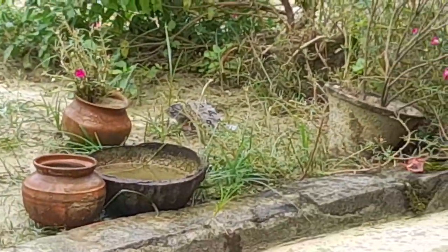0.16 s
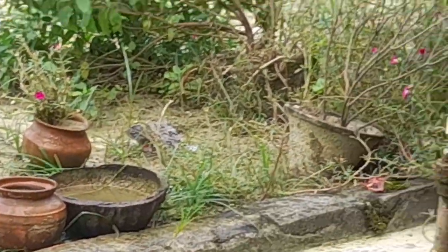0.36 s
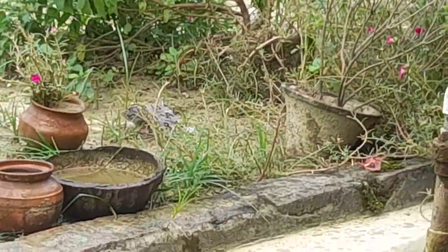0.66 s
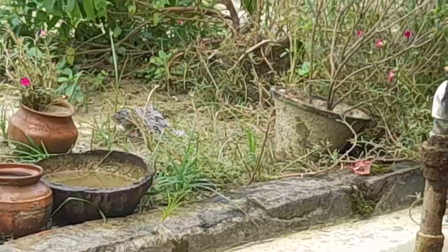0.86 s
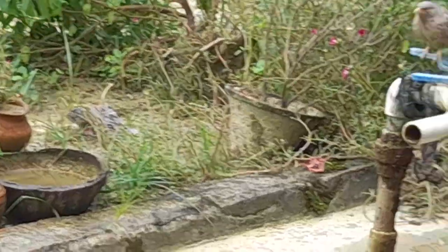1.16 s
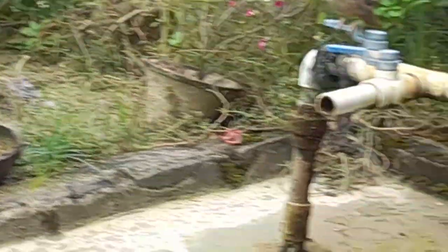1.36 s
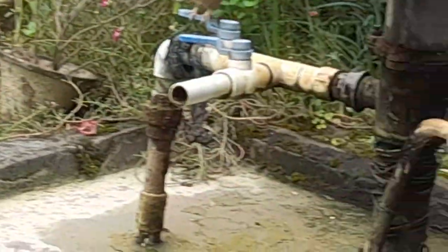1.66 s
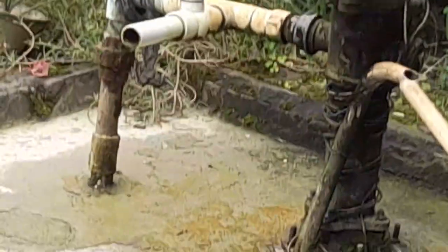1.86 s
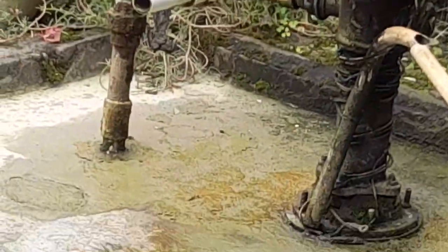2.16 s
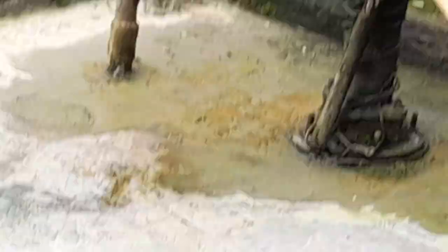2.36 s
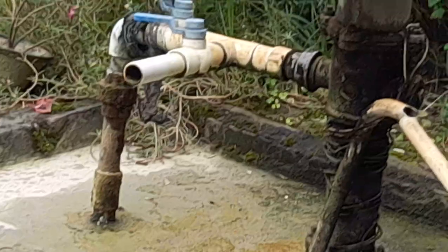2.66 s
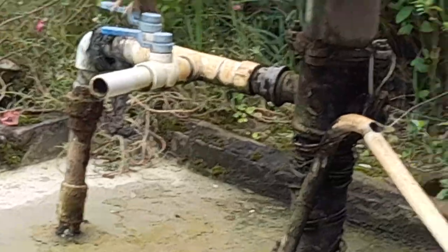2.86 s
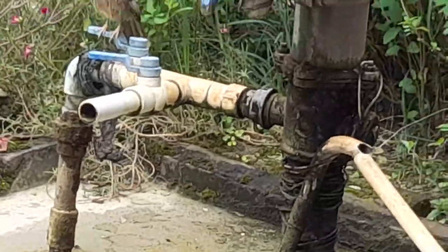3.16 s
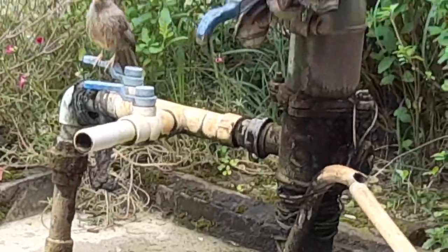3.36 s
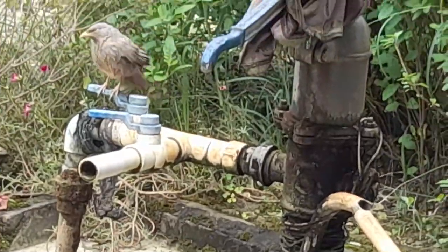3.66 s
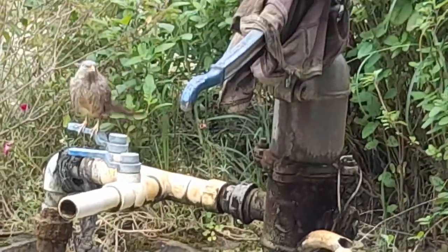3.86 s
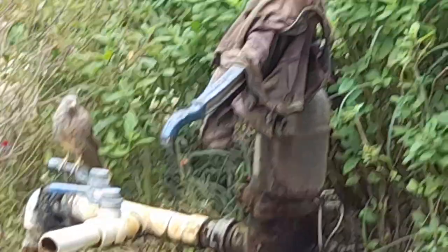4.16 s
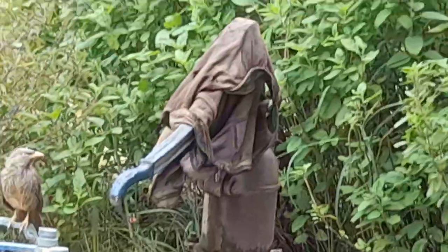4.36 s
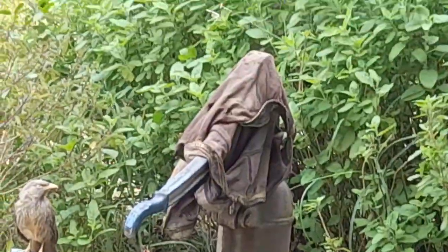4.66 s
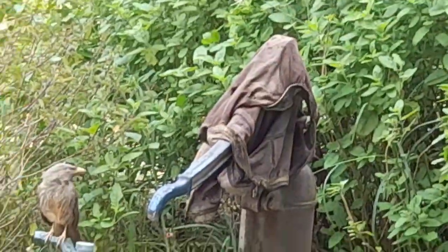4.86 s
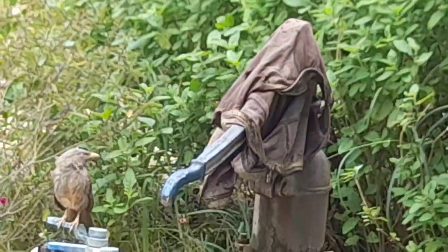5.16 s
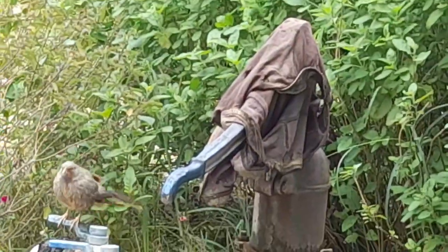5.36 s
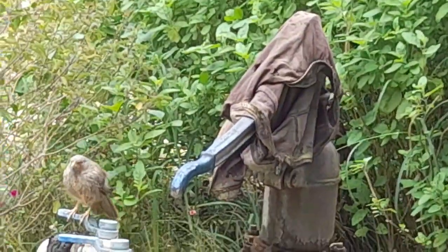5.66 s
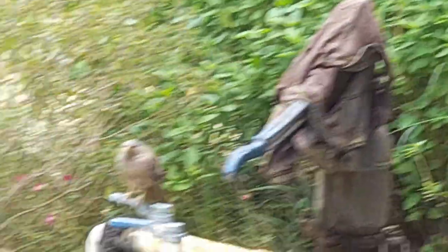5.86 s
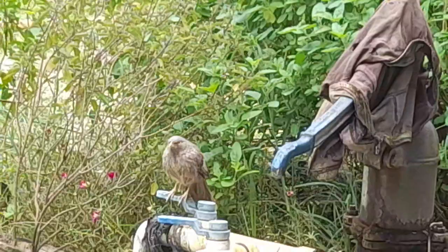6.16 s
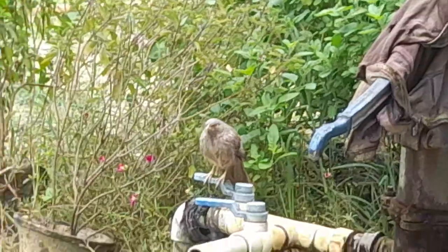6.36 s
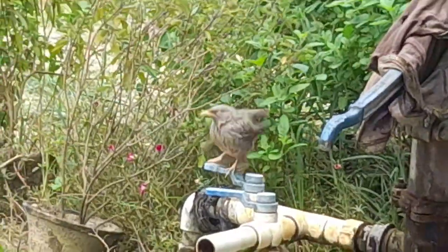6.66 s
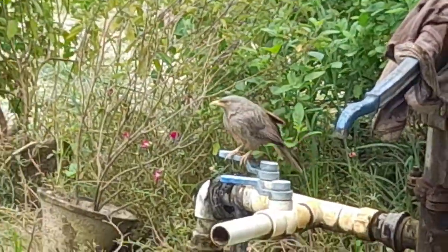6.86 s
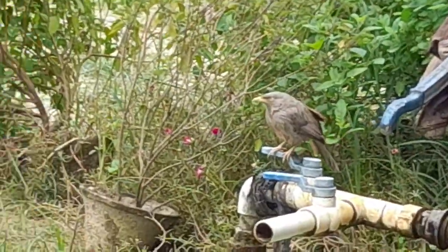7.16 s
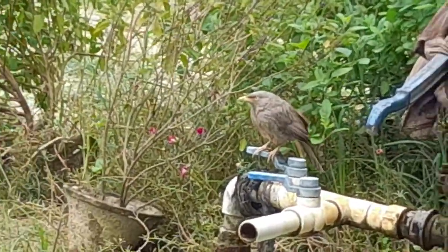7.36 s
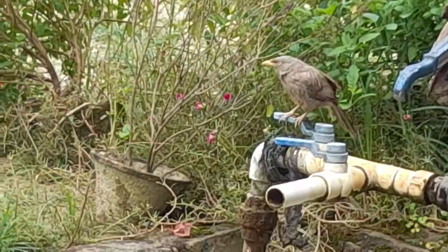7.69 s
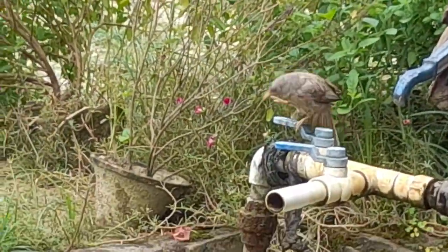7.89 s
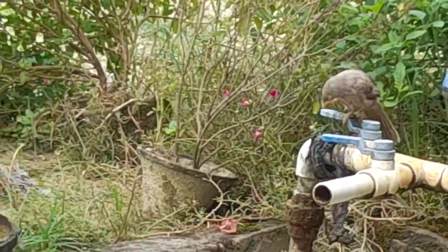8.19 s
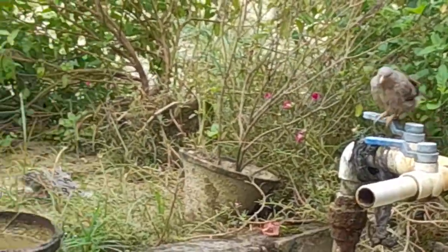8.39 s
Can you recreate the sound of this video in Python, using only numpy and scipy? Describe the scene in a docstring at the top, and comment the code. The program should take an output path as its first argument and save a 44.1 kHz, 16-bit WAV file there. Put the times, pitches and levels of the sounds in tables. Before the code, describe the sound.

Garden babblers give short arched whistles breaking into rasps over a steady low hum and leaf hiss, with a few finger knocks on the phone.

```python
"""Babblers call in short clusters in a garden: arched whistles that often break into a rasp.
Each note sums syrinx overtones, coloured by throat and beak, with a short echo from yard walls.
Shaped noise makes distant rumble, a steady bed, an insect's whine, a faint high hiss band and leaves that
hiss as the breeze rises. A hand-held phone hears it all; fingers knock on it (sagging thumps with ticks)
near its left microphone, the duller of the two."""
import sys
import numpy as np
from scipy import signal
from scipy.fft import rfft, irfft, next_fast_len
from scipy.io import wavfile
from scipy.ndimage import uniform_filter1d

SR = 44100
rng = np.random.default_rng(int(sys.argv[2]) if len(sys.argv) > 2 else 0)


def generate_wav(sig):
    """Save sig (samples, or channels by samples) to the path in sys.argv[1] as 16-bit PCM at SR."""
    pcm = np.round(np.clip(np.atleast_2d(sig).T, -1, 1) * 32767).astype(np.int16)
    wavfile.write(sys.argv[1], SR, pcm)


def ratio_of_db(decibels):
    """Turn decibels (scalar or array-like) into linear amplitude factors; 0 dB maps to 1."""
    return 10 ** (np.asarray(decibels, float) / 20)


N = 376173
SIZE = next_fast_len(N)
HZ = np.arange(SIZE // 2 + 1) * SR / SIZE


def shape(points, hz):
    """A spectrum table read on a log-frequency axis."""
    f, value = np.transpose(points)
    return np.interp(np.log(hz + 1), np.log(f), value)


def curve(rows):
    """A level table in dB as a gain for every sample."""
    s, db = np.transpose(rows)
    return ratio_of_db(np.interp(np.arange(N) / SR, s, db))


def walk(rate, count):
    """Random levels held 1 / rate s and slewed twice; spread near 1."""
    hold = int(SR / rate)
    steps = np.repeat(rng.standard_normal(count // hold + 1), hold)
    slewed = uniform_filter1d(uniform_filter1d(steps, hold), hold)
    return 1.3 * slewed[:count]


def noise(gain):
    """Stereo noise of rms 1 with this gain per frequency; the two sides share their bass."""
    # how far the two sides hear the same noise: (frequency [Hz], common share of power [0-1])
    alike = [(25, 0.65), (60, 1), (130, 1), (290, 1), (640, 0.57), (1400, 0.023), (3000, 0), (6000, .0)]
    common, left, right = rfft(rng.standard_normal((3, SIZE)))
    share = np.clip(shape(alike, HZ), 0, 1)
    pair = np.sqrt(share) * common + np.sqrt(1 - share) * np.array([left, right])
    x = irfft(pair * gain, SIZE)[:, :N]
    return x / np.sqrt(np.mean(x ** 2))


def garden():
    """Far rumble, a steady bed, breeze-led leaves, one narrow insect whine and a faint steady high hiss band."""
    # rise and fall of the far rumble: (time [s], level [dB])
    rumble_level = [(0.0, -37), (0.71, -40), (1.73, -37.5), (2.09, -38.5), (3.61, -38.5), (4.39, -38),
                    (4.89, -41.5), (5.75, -38), (6.32, -41), (6.72, -36), (8.53, -43.5)]
    # spectrum of the far rumble: (frequency [Hz], relative density [dB])
    rumble_tone = [(25, -24), (40, -16.5), (55, -1), (70, -1.5), (92, 2), (108, 2), (125, 4), (150, -7),
                   (200, -16), (260, -15.5), (400, -52)]
    rumble = curve(rumble_level) * noise(ratio_of_db(shape(rumble_tone, HZ)))

    # spectrum of the steady bed: (frequency [Hz], relative density [dB])
    bed_tone = [(88, -22.5), (150, -2.5), (205, -9.5), (280, -11), (346, -5.5), (429, -13), (1180, -21.5),
                (1300, -24), (2080, -24), (4700, -31.5), (6300, -41), (7950, -34.5), (8600, -107),
                (10400, -53), (15700, -60)]
    bed_db = -46.5 + 0.62 * walk(6, N)
    bed = ratio_of_db(bed_db) * noise(ratio_of_db(shape(bed_tone, HZ)) * (HZ > 120) * (HZ < 15600))

    # leaf hiss as the breeze comes and goes: (time [s], level [dB])
    breeze_level = [(0, -57.5), (1.3, -65), (2.3, -64.5), (4.2, -60.5), (4.8, -61.5), (5.75, -53.5),
                    (6.75, -50), (7.9, -50.5), (8.2, -53), (8.53, -55.5)]
    # spectrum of the leaf hiss: (frequency [Hz], relative density [dB])
    leaf_tone = [(600, -9.5), (1500, -1.5), (3500, 0.5), (6000, -7.5), (7800, -5), (8900, -14.5),
                 (10500, -6.5), (12500, -4), (14800, -7), (15800, -18)]
    flicker = ratio_of_db(.6 * walk(12, N))
    leaves = curve(breeze_level) * flicker * noise(ratio_of_db(shape(leaf_tone, HZ)) * (HZ > 400))

    # loudness of the insect: (time [s], level [dB])
    insect_level = [(0, -67.5), (1.65, -71), (1.9, -91), (2.6, -80), (2.95, -67), (4.9, -67.5), (5.1, -83),
                    (6.1, -66), (8.53, -67)]
    insect_hz, insect_width_hz = 7840, 232
    insect = curve(insect_level) * noise(1 / (1 + (2 * (HZ - insect_hz) / insect_width_hz) ** 2))

    high_band_hz, high_band_width_hz, high_band_db = 10330, 860, -74
    high_band = ratio_of_db(high_band_db) * noise(1 / (1 + (2 * (HZ - high_band_hz) / high_band_width_hz) ** 2))
    return rumble + bed + leaves + insect + high_band


def bends(length, rise_s, fall_s):
    """Times in a note, and two parabolas that reach 1 at its start and at its end."""
    t = np.linspace(0, length, num=14)
    before = np.clip(1 - t / rise_s, 0, 1) ** 2
    after = np.clip(1 - (length - t) / fall_s, 0, 1) ** 2
    return t, before, after


def chirp(s, length, hz, db, pan_db):
    """Slides up, holds while fading, sinks a little at the end; brightest while it holds."""
    echo_db, rough = -1.5, .22
    bright, edge_bright = -0.93, -2  # dB per kHz
    t, before, after = bends(length, rise_s=.016, fall_s=.02)
    pitch = hz * (1 - .1 * before - .07 * after)
    level_db = db - 4 * before - 4 * t / length - 10 * after
    tone = bright + (edge_bright - bright) * np.maximum(before, after)
    return pan_db, echo_db, np.transpose([s + t, pitch, level_db, tone, rough + 0 * t])


def swoop(s, length, hz, db, drop, pan_db):
    """An arch, duller than a chirp: rise and final drop bend around a sagging top and brighten the tone."""
    echo_db, rough, sag_per_s = -2.5, .1, 1.1  # the sag is a share of the pitch
    bright, edge_bright = -5.5, -3  # dB per kHz
    t, before, after = bends(length, rise_s=.018, fall_s=.022)
    pitch = hz * (1 - .16 * before - drop * after - sag_per_s * t)
    level_db = db - 6 * before - 3 * after
    tone = bright + (edge_bright - bright) * np.maximum(before, after)
    return pan_db, echo_db, np.transpose([s + t, pitch, level_db, tone, rough + 0 * t])


def rasp(s, length, db, bright, pan_db):
    """A harsh burst, every overtone smeared, that swells quickly and dies while its pitch sinks slightly."""
    pitch_hz, sag_share, rough, echo_db = 590, .04, 1, -1.5
    swell = [(0, -3), (.35, 0), (1, -9)]  # (share of the length, dB)
    rows = [(s + u * length, pitch_hz * (1 - sag_share * u), db + d, bright, rough) for u, d in swell]
    return pan_db, echo_db, rows


def peep(s, length, hz, db, pan_db):
    """A thin, nearly level note with weak overtones, loudest in the middle."""
    sag_share, edge_db, bright, rough, echo_db = .02, -4, -9, .3, -2  # brightness in dB per kHz
    rows = [(s + u * length, hz * (1 - sag_share * (u - .5)), db + edge_db * abs(2 * u - 1), bright, rough)
            for u in (0, .5, 1)]
    return pan_db, echo_db, rows


def scold(s, length, hz, db, rasp_db):
    """The nearest bird's loud whistle sags and brightens, then plunges into a rasp."""
    # the plunge: (time after the whistle [s], pitch [Hz], level against the rasp [dB],
    # brightness [dB per kHz], roughness [0-1])
    plunge = [(0.014, 1748, -4.5, -5, .3), (.023, 1248, 0.5, -1, 0.63), (.035, 860, 2.5, 0.5, .85),
              (.049, 843.5, -25, -6, 0.6)]
    pan_db, echo_db = 13, -11.5
    attack_s, start_db, fade_db, sag_hz_per_s = 0.0085, -10, -7, 3600
    start_bright, end_bright, end_rough = -6.5, -2, .12  # brightness in dB per kHz
    rows = [(s, hz, db + start_db, start_bright, 0),
            (s + attack_s, hz - sag_hz_per_s * attack_s, db, start_bright, 0),
            (s + length, hz - sag_hz_per_s * length, db + fade_db, end_bright, end_rough)]
    rows += [(s + length + after, f, rasp_db + d, bright, rough) for after, f, d, bright, rough in plunge]
    return pan_db, echo_db, rows


def squawk(s, length, hz, db, rough):
    """The nearest bird's held hoarse note with short edges."""
    pan_db, echo_db = 13, -11.5
    edge_s, edge_db, bright = .008, -5, -1.8  # brightness in dB per kHz
    steps = [(0, edge_db), (edge_s, 0), (length - edge_s, 0), (length, edge_db)]
    return pan_db, echo_db, [(s + u, hz, db + d, bright, rough) for u, d in steps]


def notes():
    """All notes as (pan dB, echo dB, rows of s, pitch Hz, level dB, brightness dB per kHz, roughness 0-1)."""
    # bright chirps: (start [s], length [s], pitch between the bends [Hz], level [dB], left minus right [dB])
    chirps = [(.005, .03, 2450, -42.5, 4), (0.052, 0.035, 3230, -43.5, 13), (.06, 0.0728, 2350, -45.5, 10),
              (0.139, 0.048, 3000, -46, 3), (0.507, 0.046, 2484, -46.5, 13), (1.949, .04, 2396, -44, -3),
              (4.085, 0.05, 2460, -49.5, -4), (6.176, 0.04, 3160, -44.5, 7)]
    # duller arched swoops: (start [s], length [s], pitch ahead of bends and sag [Hz], level [dB],
    # final drop [share of pitch], left minus right [dB])
    swoops = [(.006, 0.065, 2230, -42.5, .01, -3), (0.233, 0.044, 2600, -43, 0.35, 4),
              (0.33, .047, 2270, -47, 0.106, -3), (0.593, .043, 3116, -49, 0.35, 0),
              (0.688, 0.075, 2680, -45, .2, -3), (1.997, .039, 3083, -47.5, .5, -3),
              (4.173, 0.055, 2496, -47.5, 0.093, -1), (8.151, 0.034, 3210, -49, 0.071, 3),
              (8.258, .045, 2070, -57.5, .12, -15)]
    # thin peeps of farther birds: (start [s], length [s], middle pitch [Hz], level [dB], left minus right [dB])
    peeps = [(.582, .015, 2290, -49, 4), (1.61, 0.016, 2050, -57, 9), (1.647, 0.13, 3600, -61, -10),
             (1.843, 0.04, 2707, -54, -4), (2.566, 0.017, 3000, -59, -7), (2.627, .02, 2920, -61, 12),
             (2.694, .025, 2955, -61, -10), (2.765, 0.024, 2840, -61, 3), (2.805, .125, 3610, -62, -10),
             (5.33, .04, 2100, -59, 3), (5.49, 0.041, 2810, -57, 6), (5.672, 0.061, 2763, -55, 2),
             (6.12, 0.062, 2288, -52.5, 0), (6.628, .035, 2039, -53.5, -10), (7.141, 0.018, 3515, -58, -12),
             (7.163, .11, 1000, -58, -4), (7.236, .03, 3430, -57, -9), (7.288, 0.022, 1390, -56, -9),
             (8.05, .15, 4320, -62, 8), (8.29, 0.062, 3750, -63, 0)]
    # rasps, often where a swoop breaks off: (start [s], length [s], level [dB],
    # brightness [dB per kHz], left minus right [dB])
    rasps = [(0.086, 0.05, -45.5, -3, -6), (0.353, 0.025, -50.5, -1.5, -2), (0.607, 0.042, -51, -1.5, -4),
             (0.751, 0.049, -50.5, -1.5, -7), (2.028, 0.0195, -44.5, -3, -8), (3.459, 0.033, -53, -3, -6),
             (4.237, 0.035, -52, -3, 1), (5.551, 0.23, -53, -4.5, -3.5), (5.614, .06, -47.5, -6, 0),
             (6.207, .03, -45, -2.5, -1), (6.67, 0.045, -49, -5, -5), (7.211, 0.027, -50, -4, -14),
             (7.581, 0.041, -48, -3, 21)]
    # scolds of the nearest bird: (start [s], whistle length [s], start pitch [Hz], whistle level [dB],
    # rasp level [dB])
    scolds = [(1.757, .045, 2288, -36, -40.5), (3.749, .088, 2320, -35, -34.5)]
    # its squawk after the second scold: (start [s], length [s], pitch [Hz], level [dB], roughness [0-1])
    squawks = [(3.923, .055, 432, -37.5, .67)]
    kinds = [(chirp, chirps), (swoop, swoops), (peep, peeps), (rasp, rasps), (scold, scolds), (squawk, squawks)]
    return [kind(*row) for kind, table in kinds for row in table]


def syrinx(rows):
    """Overtones of the syrinx through throat and beak; roughness smears each one into a noisy band."""
    # resonances of throat and beak: (centre [Hz], width [Hz], peak [dB])
    resonances = [(900, 340, 2), (2220, 560, 5.5), (3060, 380, -4), (4300, 560, 7), (5200, 380, 2.5),
                  (6200, 550, -1), (7860, 1200, -20), (13300, 2000, -11)]
    s, *columns = np.transpose(rows)
    t = np.arange(s[0], s[-1], 1 / SR)
    hz, db, bright, rough = (uniform_filter1d(np.interp(t, s, c), size=150, mode="nearest") for c in columns)
    rough = np.clip(rough, 0, 1) ** 1.2

    jitter = (.004 + .015 * rough) * walk(300, len(t))
    phase = 2 * np.pi * np.cumsum(hz * (1 + jitter)) / SR
    k = np.arange(1, 1 + int(15500 / hz.min()))[:, None]  # overtone numbers
    throat = sum(ratio_of_db(peak_db) / (1 + (2 * (k * hz - f) / width) ** 2) for f, width, peak_db in resonances)
    tilt = ratio_of_db(bright * np.minimum(k * hz, 7000) / 1000)
    gains = throat * tilt * (k * hz < 15500)
    gains = gains / np.sqrt(np.sum(gains ** 2, axis=0) / 2)

    # a slightly rough voice wavers; a rasp scatters each overtone as far as the next
    flutter = np.array([(1 - rough) * walk(350, len(t)) + rough * walk(1000, len(t)) for _ in k])
    waver = np.sqrt(1 - rough) + np.sqrt(rough) * flutter
    voice = np.sum(gains * waver * np.sin(k * phase + k ** 2), axis=0)
    edge = np.clip(np.minimum(t - t[0], t[-1] - t) / .004, 0, 1)
    return voice * ratio_of_db(db) * edge


def birds():
    """Every note at its side, with the short echo of yard walls; the near bird carries least of it."""
    direct, walls = np.zeros((2, N + SR)), np.zeros((1, N + SR))
    for pan_db, echo_db, rows in notes():
        x = syrinx(rows)
        i = int(rows[0][0] * SR)
        direct[:, i:i + len(x)] += x * ratio_of_db(np.array([[pan_db], [-pan_db]]) / 2)
        walls[:, i:i + len(x)] += x * ratio_of_db(echo_db)
    # moving leaves on the way to the walls make the echo waver
    walls = walls * ratio_of_db(3 * walk(120, N + SR))
    t = np.arange(SR // 2) / SR
    t60_s, delay_s = 0.23, .006
    decay = np.exp(-np.log(1000) * t / t60_s)
    tail = rng.standard_normal((2, len(t))) * decay * np.clip((t - delay_s) / 0.0012, 0, 1)
    tail = tail / np.sqrt(np.sum(tail ** 2, axis=1, keepdims=True))
    echo = signal.fftconvolve(walls, tail, axes=1)[:, :N + SR]
    return (direct + echo)[:, :N]


def knocks():
    """A tick, then a thump through the casing whose pitch sags as the contact spreads."""
    # finger knocks: (time [s], thump level ahead of its envelope [dB], settled ring [Hz], decay by 60 dB [s],
    # tick level [dB], right side against left [dB])
    taps = [(1.92, -16.5, 280, 0.016, -28, -28), (1.929, -10, 230, 0.034, -18, -44),
            (2.3616, -16.5, 221, 0.046, -56, -23), (3.812, 1, 101, 0.027, -50, -43),
            (7.5186, -21.5, 230, 0.023, -54, -26)]
    tick_lead_s = .0007
    out, t = np.zeros((2, N + SR)), np.arange(SR // 5) / SR
    for s, db, hz, t60, tick_db, right_db in taps:
        cycles = hz * t + .45 * (1 - np.exp(-t * hz / .16))
        attack = 1 - np.exp(-t * hz / .25)
        thump = -np.sin(2 * np.pi * cycles) * attack * np.exp(-np.log(1000) * t / t60)
        thump = np.roll(thump, int(tick_lead_s * SR))
        ring = np.sin(2 * np.pi * 1900 * t) * np.exp(-t / .0008)
        tick = ring + 0.43 * rng.standard_normal(len(t)) * np.exp(-t / 0.00075)
        i = int(s * SR)
        out[:, i:i + len(t)] += (ratio_of_db(db) * thump + ratio_of_db(tick_db) * tick) * np.array([[1], [ratio_of_db(right_db)]])
    return out[:, :N]


def scene():
    """All sources at the two microphone ports."""
    return birds() + knocks() + garden()


def top_cut(x):
    """Nothing passes above the cut-off."""
    return signal.sosfilt(signal.butter(12, 15870, fs=SR, output="sos"), x)


def record(dry):
    """The left port is later and loses the treble; each microphone adds faint hiss; the top is cut."""
    # response of the left microphone: (frequency [Hz], gain against the right [dB])
    left_mic = [(40, 2), (120, -2), (250, -3), (700, -3.5), (1300, -2), (2400, -6), (5000, -2), (6800, -8),
                (7800, -24), (8800, -14), (10000, -45), (15500, -48)]
    # spectrum of the microphone hiss: (frequency [Hz], relative density [dB])
    hiss_tone = [(3000, 3), (8000, 11), (12000, -4), (14500, 4), (15800, -11)]
    left_lag_s, hiss_db, top_hz = 0.000382, -80, 15800
    lag = np.exp(-2j * np.pi * HZ * left_lag_s)
    left = irfft(rfft(dry[0], SIZE) * ratio_of_db(shape(left_mic, HZ)) * lag, SIZE)[:N]
    hiss = ratio_of_db(hiss_db) * noise(ratio_of_db(shape(hiss_tone, HZ)) * (HZ > 2000))
    both = np.array([left, dry[1]]) + hiss
    mix = irfft(rfft(both, SIZE) * (HZ < top_hz), SIZE)[:, :N]
    return top_cut(mix)


dry = scene()
out = record(dry)
generate_wav(out)
```